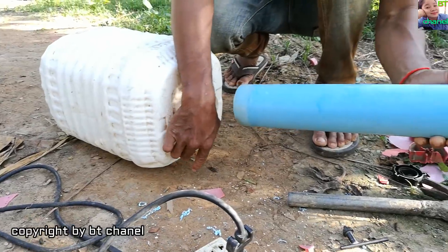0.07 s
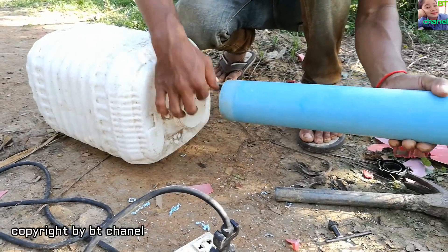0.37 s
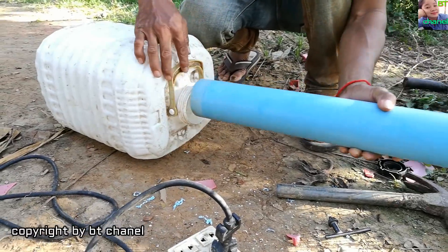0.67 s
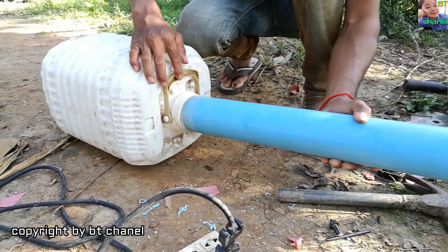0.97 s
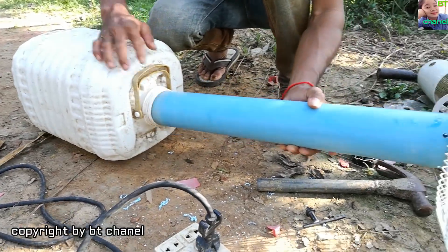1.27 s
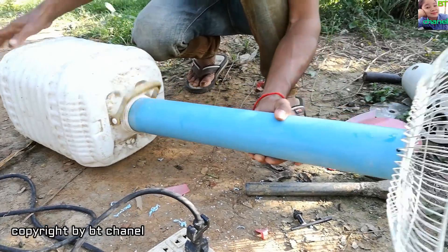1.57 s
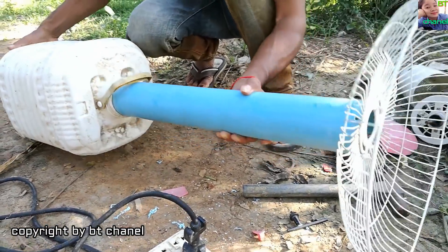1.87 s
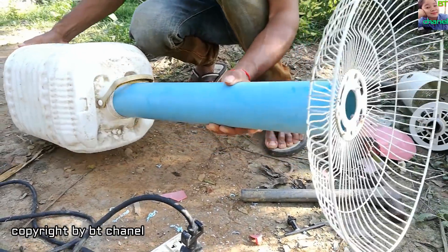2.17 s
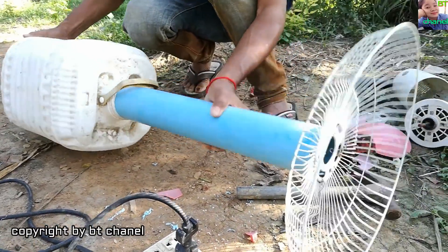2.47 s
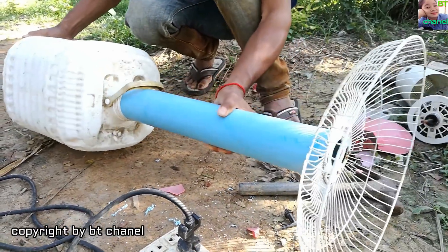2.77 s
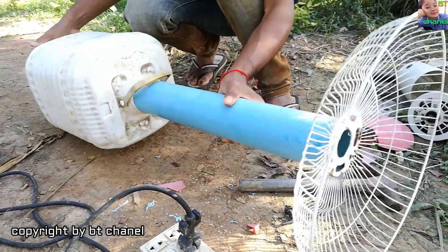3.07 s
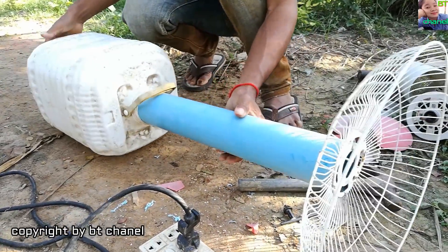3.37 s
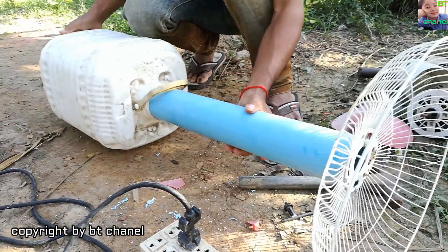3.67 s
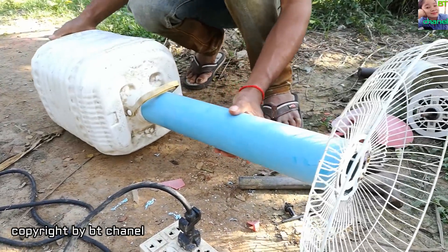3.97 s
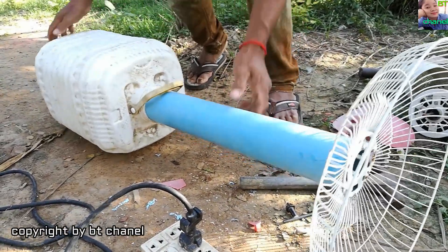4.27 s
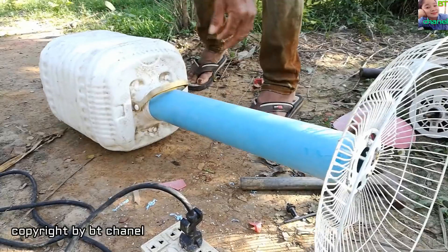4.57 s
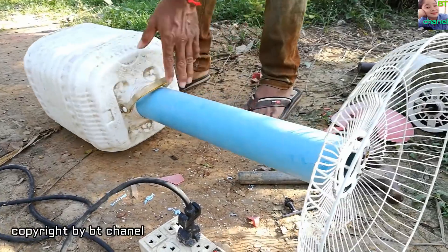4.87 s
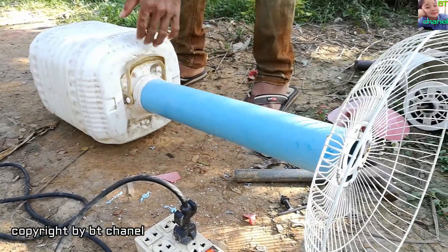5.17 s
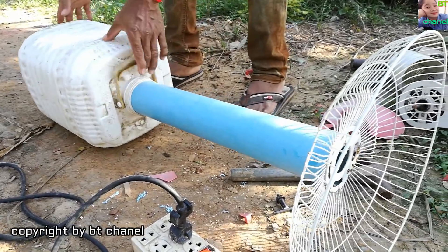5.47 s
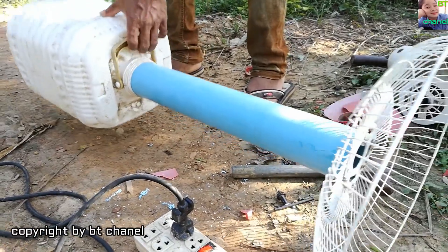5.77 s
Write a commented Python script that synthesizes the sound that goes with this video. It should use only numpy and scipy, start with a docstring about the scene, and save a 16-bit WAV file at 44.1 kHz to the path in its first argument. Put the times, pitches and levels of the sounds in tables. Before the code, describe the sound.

The handle of an empty plastic jerrycan flips over with a clack. A plastic pipe knocks and rubs hollowly against the neck, then scrapes into place. The can is tipped and dragged on bare ground, booming as grit ticks under it. Near the end its dented wall springs out with a loud pop, followed by a few knocks. A close phone microphone hears it outdoors, over a distant rumble and faint insects.

```python
"""Outdoors, over a distant rumble and faint insects, the handle of an empty jerrycan flips over and clacks.
A plastic pipe knocks, rubs and squeaks at the can's neck, then scrapes into place at about 2.4 s.
The hollow can is tipped and dragged on bare ground: it booms, grit ticks, and a jolt makes the wire fan
guard on the pipe ring faintly. Near 5 s the dented wall pops back out, and a few last knocks follow.
A phone with two microphones stands close by."""
import sys
import numpy as np
from scipy import signal
from scipy.fft import rfft, irfft
from scipy.io import wavfile
from scipy.ndimage import map_coordinates

SR = 44100
rng = np.random.default_rng(int(sys.argv[2]) if len(sys.argv) > 2 else 0)


def inscribe(sig):
    """Save sig as 16-bit PCM at rate SR to the path in sys.argv[1].

    A 1-D sig is mono; a 2-D sig holds one channel per row.
    Samples are clipped to [-1, 1] before scaling.
    """
    pcm = np.round(np.clip(np.atleast_2d(sig).T, -1, 1) * 32767)
    wavfile.write(sys.argv[1], SR, pcm.astype(np.int16))


N = 255780

# the notes that the can's wall and the pipe ring at: f/Hz, relative level/dB
CAN_NOTES = [(270, -4), (315, -5), (408, -3), (450, -3), (568, -4), (680, -6), (784, 1), (822, 0),
             (885, -1), (970, 3), (1312, -8), (2100, -11), (2770, -6), (3122, -5), (3245, -5), (4580, -9),
             (5092, -6), (5358, -8)]
PIPE_NOTES = [(824, -1), (1010, -1), (1360, -4), (1500, -5), (2090, -6), (2430, -6), (3060, 0), (3200, 0),
              (4750, -1), (5650, -2)]
KNOCK_HZ = 950  # the middle of a knock, between its low and high parts


def undb(db):
    """Turn decibels into a number to multiply by."""
    return 10 ** (np.asarray(db) / 20)


def rms(x):
    """The average strength of a sound."""
    return np.sqrt(np.mean(x ** 2)) + 1e-12


def band(x, lo, hi, order=3):
    """Keep the part of a sound between lo and hi Hz."""
    return signal.sosfilt(signal.butter(order, [lo, min(hi, .45 * SR)], "band", fs=SR, output="sos"), x)


def colour(x, points):
    """Turn lows and highs up or down along a curve of points: f/Hz, gain/dB."""
    hz, db = np.transpose(points)
    f = np.fft.rfftfreq(x.shape[-1], 1 / SR)
    return irfft(rfft(x) * undb(np.interp(np.log(f + 1), np.log(hz), db)), x.shape[-1])


def stereo_noise(size, apart_hz=340):
    """Noise at two microphones: alike in the bass, unrelated higher up."""
    f = np.fft.rfftfreq(size, 1 / SR)
    mid, side = rfft(rng.standard_normal((2, size)))
    share = .5 * f ** 6 / (f ** 6 + apart_hz ** 6)
    return irfft(mid * np.sqrt(1 - share) + side * np.sqrt(share) * np.array([[1], [-1]]), size)


def fade(t, t60):
    """Die away by 60 dB every t60 seconds."""
    return np.exp(-np.log(1000) * t / t60)


def wander(per_s):
    """Drift at random, roughly between -1 and 1, with per_s new goals a second."""
    goals = rng.standard_normal(int(per_s * N / SR) + 2)
    return np.interp(np.arange(N) * per_s / SR, np.arange(len(goals)), goals)


def add(out, start, sound):
    """Mix a sound in at a time in seconds."""
    i = max(0, int(start * SR))
    out[:, i:i + sound.shape[1]] += sound[:, :N - i]


def ring(notes, t, scatter_db, detune=.004, apart_hz=340):
    """Fading notes, a little different each time; high ones reach the two microphones out of step."""
    out = 0
    for hz, db, t60 in notes:
        size, shift, turn, skew = rng.standard_normal(4)
        gap = min(hz / apart_hz, 1) ** 4 * (np.pi / 4 + skew / 10)
        phase = np.pi * turn + gap * np.array([[1], [-1]])
        tone = np.sin(2 * np.pi * hz * (1 + detune * shift) * t + phase)
        out = out + undb(db + scatter_db * size) * fade(t, t60) * tone
    return out


def distant_rumble(level_db=-45.5, swell_db=-.5, half_width_hz=11.1):
    """A far-off rumble with wavering tones and a faint hiss of air and insects, swelling slightly."""
    # the shape of the rumble and hiss: f/Hz, relative level/dB
    air_shape = [(13, -34), (32, -7), (106, -7.5), (143, -8), (200, -13.5), (263, -10.5), (380, -27.5),
                 (570, -25.5), (1500, -29.5), (2450, -44.5), (6440, -51.5), (8000, -49), (10500, -44.5),
                 (12500, -49.5), (16000, -51)]
    # the wavering tones: f/Hz, level/dB
    low_tones = [(39, -59), (105, -48.5), (191, -48)]
    air = colour(stereo_noise(N), air_shape)
    low = signal.sosfiltfilt(signal.butter(2, KNOCK_HZ, fs=SR, output="sos"), air)
    out = sum(x * undb(level_db + swell_db * wander(4)) for x in (low, air - low)) / rms(air)
    for hz, db in low_tones:
        tone = band(rng.standard_normal(N), hz - half_width_hz, hz + half_width_hz, order=2)
        out = out + tone * undb(db) / rms(tone)
    return out


def insects(level_db=-77, swell_db=7, half_width_hz=160):
    """Faint insects in the grass swell and fade, each on its own pitch."""
    out = 0
    for hz in (9150, 9950):
        buzz = band(stereo_noise(N), hz - half_width_hz, hz + half_width_hz, order=2)
        out = out + buzz / rms(buzz) * undb(level_db + swell_db * np.minimum(wander(5), 1))
    return out


def whine(hz=14510, level_db=-76):
    """A thin, steady whine."""
    return undb(level_db) * np.sqrt(2) * np.sin(2 * np.pi * hz * np.arange(N) / SR)


def yard_echo(x, near_db=-21, near_t60=.2, far_db=-45.5, far_t60=.8):
    """The yard sends back a dull, scattered echo."""
    t = np.arange(SR) / SR
    arrival = np.clip((t - .008) / .017, 0, 1)
    near = band(stereo_noise(SR) * arrival * fade(t, near_t60), 150, 8500, order=1)
    far = band(stereo_noise(SR) * arrival * fade(t, far_t60), 200, 4000, order=2)
    echo = sum(undb(db) * h / np.sqrt(np.sum(h ** 2) / 2) for h, db in [(near, near_db), (far, far_db)])
    return signal.fftconvolve(x, echo, axes=1)[:, :N]


def wire_guard(t60=1.47, spokes_db=-15):
    """A jolt, dulled through the ground, rings the guard's hoops; its many unequal spokes shimmer above."""
    # jolts: t/s, level/dB, dull above f/Hz
    jolts = [(3.2, -42.5, 1230), (4.979, -48, 4500)]
    # notes of the hoops: f/Hz, relative level/dB
    hoops = [(613, 0), (678, -5), (925, -5), (1389, 0), (1432, 0), (1986, -7), (2900, -6), (3270, -5)]
    out, t = np.zeros((2, N)), np.arange(5 * SR // 4) / SR
    spokes = [(hz, spokes_db) for hz in rng.uniform(2200, 6200, 48)]
    notes = [(hz, db, t60) for hz, db in 2 * hoops + spokes]  # slightly mistuned pairs throb
    for start, db, dull_hz in jolts:
        wires = band(ring(notes, t, scatter_db=2, detune=.006), 450, dull_hz, order=1)
        add(out, start, wires * undb(db) / rms(wires[:, :int(.05 * SR)]))
    return out


def squeaks(width=.028):
    """Plastic slips on plastic and briefly locks on to one rough note."""
    # squeaks: t/s, length/s, f/Hz, level/dB
    rubs = [(.70, .13, 2480, -55), (2.08, .12, 1710, -63)]
    out = np.zeros((2, N))
    for start, length, hz, db in rubs:
        size = int(length * SR)
        tone = band(stereo_noise(size), hz * (1 - width), hz * (1 + width), order=2) * np.hanning(size)
        add(out, start, tone * undb(db) / rms(tone))
    return out


def grit_crackle(grit_db, per_s=28):
    """Single grains of grit snap at random, louder while something slides."""
    out, t = np.zeros((2, N)), np.arange(SR // 50) / SR
    for start, size in rng.random((int(per_s * N / SR), 2)):
        start *= N / SR
        grain = band(stereo_noise(len(t)) * fade(t, .012), 2000, 14000, order=1)
        db = min(grit_db[int(start * SR)], -54) - 10 + 16 * size ** 2
        add(out, start, grain * undb(db) / rms(grain))
    return out


def ticks(click_db=5):
    """Grit and plastic touch: a sharp click with a short rustle of the wall behind it."""
    # ticks: t/s, level of the crack/dB, high snap relative to the crack/dB
    touches = [(0.165, -45.5, -22), (2.296, -42.5, -24), (2.42, -40.5, 9), (2.464, -38, -6),
               (2.785, -49.5, -9), (2.886, -46.5, -7), (3.122, -52, 16), (3.244, -45.5, -13),
               (3.299, -42.5, -13), (3.337, -45, -15), (4.205, -51, -30), (4.74, -41.5, 3.5),
               (4.862, -55, -4)]
    out, t = np.zeros((2, N)), np.arange(SR // 8) / SR
    attack = int(.008 * SR)
    for start, db, snap_db in touches:
        click = stereo_noise(len(t)) * (fade(t, .06) + undb(click_db) * fade(t, .008))
        for lo, hi, part_db in [(1000, 4100, db), (5800, 14000, db + snap_db)]:
            part = band(click, lo, hi, order=2)
            add(out, start, part * undb(part_db) / rms(part[:, :attack]))
    return out


def stroke_levels():
    """Drone, rasp and grit over time, in dB: each push or drag takes hold, slides and coasts to a stop."""
    # pushes of the pipe and drags of the can; weight makes the can drone, grit under it hisses:
    # t/s, length/s, rasp/dB, drone relative to rasp/dB, grit relative to rasp/dB
    strokes = [(0.674, 0.34, -59.5, 15.5, -4), (1.02, 0.34, -53, 12, -5), (1.43, 0.24, -54, 8.5, -4.5),
               (1.907, 0.07, -48, 7, -6.5), (2.035, 0.091, -55, 8, -13), (2.29, 0.023, -52.5, 14.5, -9),
               (2.324, 0.071, -49.5, 16.5, -21), (2.42, 0.079, -48.5, 11.5, -17),
               (2.755, 0.29, -58, 14.5, -6), (3.113, 0.14, -45, 16.5, -8.5), (3.54, 0.14, -54.5, 9.5, -5.5),
               (4.207, 0.13, -49.5, -1, -12), (4.569, 0.36, -56, 9.5, -8), (4.933, 0.031, -36.5, 2, -36),
               (5.656, 0.056, -58, 2.5, -11)]
    # hands rubbing lightly all along: drone/dB, rasp/dB, grit/dB
    holding = [-56.5, -67.5, -78.5]
    # time to die away after a stroke: drone/s, rasp/s, grit/s
    coast_t60 = [0.62, 0.3, 0.42]
    t = np.arange(0, N / SR, .001)
    power = undb(holding)[:, None] ** 2
    for start, length, rasp_db, drone_db, grit_db in strokes:
        grip = np.clip((t - start) / (.012 + .13 * length), 0, 1)  # long strokes take hold more slowly
        coast = fade(np.maximum(t - start - length, 0), np.array(coast_t60)[:, None])
        strength = undb(rasp_db + np.array([[drone_db], [0], [grit_db]]))
        power = power + (strength * grip * coast) ** 2
    return [np.interp(np.arange(N) / SR, t, db) for db in 10 * np.log10(power)]


def random_slips(per_s):
    """Tiny jerks, forwards or backwards, at random moments."""
    return (rng.random(N) < per_s / SR) * rng.choice([-1, 1], N)


def friction(per_s, spread_db, t60, notes_db, catch_db, flex=.07):
    """The can sticks and slips; each slip rings its wall, whose notes drift as it bends."""
    t = np.arange(SR // 12) / SR
    catch = catch_db * wander(110)
    notes = [(hz, notes_db + db, t60) for hz, db in CAN_NOTES]
    out = 0
    for spot in range(3):  # each spot of the wall rings differently
        slips = random_slips(per_s) * undb(spread_db * np.minimum(rng.exponential(size=N), 4) + catch)
        clear = ring(notes, t, scatter_db=5, detune=.04)
        wall = stereo_noise(len(t)) * (fade(t, t60) + 2 * fade(t, .0031)) + clear
        out = out + signal.oaconvolve(slips[None], wall, axes=1)[:, :N]
    place = np.cumsum(1 + flex * wander(10))  # an uneven speed bends the pitch
    return np.array([map_coordinates(x, [place], mode="mirror") for x in out])


def sliding(drone_db, rasp_db, grit_db):
    """Slow slips make the can boom and drone; fine grit rasps and hisses under it."""
    coarse = friction(per_s=150, spread_db=2, t60=.055, notes_db=-8, catch_db=.5)
    fine = friction(per_s=1100, spread_db=5.5, t60=.04, notes_db=-18, catch_db=2)
    layers = [(band(coarse, 110, 321.5), drone_db - 1.5),
              (band(coarse, 200, 1600, order=2), drone_db - 5),
              (band(fine, 1300, 4600), rasp_db - 1.5),
              (band(fine, 5600, 15500, order=2), grit_db + 7.5)]
    return sum(x * undb(db) / rms(x) for x, db in layers)


def pipe_scrape(start_s=2.339, stop_s=2.394, end_db=-22.5, rise_db=11):
    """The tight pipe is forced into the neck: quick slips ring it harder and harder until it stops."""
    t = np.arange(N) / SR
    way = np.clip((t - start_s) / (stop_s - start_s), 0, 1)
    force = np.minimum(20 * way, 1) * undb(rise_db * (way - 1))
    force *= fade(np.maximum(t - stop_s, 0), .15)
    age = t[:SR // 10]
    notes = [(hz, db - 17, .05 * np.sqrt(KNOCK_HZ / hz)) for hz, db in PIPE_NOTES]
    rasp = 0
    for spot in range(4):  # the rim touches at several spots
        slips = random_slips(per_s=380) * undb(2.5 * rng.standard_normal(N))
        wall = stereo_noise(len(age)) * fade(age, .015) + ring(notes, age, scatter_db=1, detune=.02)
        rasp = rasp + signal.oaconvolve(slips[None], wall, axes=1)[:, :N]
    rasp = band(rasp, KNOCK_HZ, 16700, order=1)
    return rasp * force * undb(end_db) / rms(rasp)


def blows(hits, notes, zones_db, notes_db, crack_db, crack_s, treble_damp, ring_s, scatter_db=2):
    """Struck plastic: a brief crack, a blur of wall notes, a few clear ones and the boom of the air."""
    # five zones (boom, hollow, knock, crack, snap): lowest f/Hz, highest f/Hz
    zones = [(88, 220), (220, 600), (600, 1500), (1500, 6000), (6000, 13000)]
    out, t = np.zeros((2, N)), np.arange(SR // 4) / SR
    push = 1 - np.exp(-t / .00069)
    octaves = np.log2(np.sqrt(np.prod(zones[1:], axis=1)) / KNOCK_HZ)
    for start, level_db, softness, boom_db, boom_hz in hits:
        # zones_db sets the four upper zones for a hard blow; a softer one is duller and rings longer
        levels = [boom_db, *(level_db + np.array(zones_db) - softness * octaves)]
        t60 = ring_s + .0051 * max(softness, 0)
        # in plastic, high notes die sooner
        wall_notes = [(hz, notes_db + db, t60 * (600 / hz) ** .39) for hz, db in notes]
        clear = ring(wall_notes + [(boom_hz, -5, t60)], t, scatter_db)
        for k, ((lo, hi), db) in enumerate(zip(zones, levels)):
            decay = fade(t, t60 * treble_damp ** (k - 2)) + undb(crack_db) * fade(t, crack_s)
            part = band((stereo_noise(len(t)) * decay + clear) * push, lo, hi)
            add(out, start, part * undb(db) / rms(part[:, :int(.02 * SR)]))
    return out


def handle_clacks():
    """The carrying handle flips over and clacks."""
    # clacks: t/s, level/dB, softness/(dB per octave), boom level/dB, boom f/Hz
    hits = [(.124, -47, 10.5, -51, 190), (.1635, -43, 11.5, -43, 186), (.4302, -22, 3.5, -27, 158.3)]
    # the handle's notes: f/Hz, relative level/dB
    notes = [(400, -8), (544, -6), (824, -11), (1093, 3), (1255, 0), (2089, -11), (2476, -9), (3268, -13),
             (3811, -16), (5184, -15)]
    return blows(hits, notes, zones_db=[-10.5, 2, 4, 3], notes_db=-8.5,
                 crack_db=-2, crack_s=.02, treble_damp=.85, ring_s=.105)


def pipe_taps():
    """The pipe taps and snaps against the can's neck."""
    # taps: t/s, level/dB, softness/(dB per octave), boom level/dB, boom f/Hz
    hits = [(.974, -38.5, 8.5, -37.5, 157), (1.565, -27.5, 1, -37, 105.5), (1.955, -39.5, 1.5, -47, 118),
            (3.004, -39.5, 4, -53, 110)]
    return blows(hits, PIPE_NOTES, zones_db=[-7.5, 0, .5, 2.5], notes_db=-14,
                 crack_db=6.5, crack_s=.0065, treble_damp=.6, ring_s=.16)


def can_knocks():
    """Pipe, hand and ground hit the can; its boom's pitch depends on the hold and the blocked neck."""
    # knocks: t/s, level/dB, softness/(dB per octave), boom level/dB, boom f/Hz
    hits = [(.721, -37, 8.5, -30.5, 151.5), (.861, -53, 11, -38, 158), (.893, -68, -1, -32.5, 160.4),
            (1.0445, -32.5, 9.5, -30.5, 144.4), (1.206, -40.5, 12, -32.5, 149),
            (1.2345, -26.5, 4.5, -16.5, 141.5), (1.249, -25, 4, -24, 140.6), (2.397, -35, 6, -26, 137),
            (2.421, -37.5, 10, -47, 178), (3.136, -25, 5, -37, 94), (3.212, -33.5, 8.5, -33, 94),
            (3.23, -39, 7.5, -41, 95), (3.298, -39.5, 9, -43.5, 97), (3.619, -41, 6.5, -36, 122),
            (4.929, -36.5, 2, -41.5, 99), (5.44, -24.5, 1, -65, 105.3), (5.474, -32, 4.5, -56, 106),
            (5.526, -47.5, 6, -59.5, 105)]
    return blows(hits, CAN_NOTES, zones_db=[-8, .5, 2.5, 0], notes_db=-13,
                 crack_db=3.5, crack_s=.0024, treble_damp=.62, ring_s=.13)


def wall_pop(thump_hz=48, thump_db=-28, thump_t60=.09):
    """The dented wall springs out and the whole can rings; a short, deep thump comes with the loud pop."""
    # the pop: t/s, level/dB, softness/(dB per octave), boom level/dB, boom f/Hz
    pops = [(4.9765, -8.5, 0.94, -37.5, 105.7)]
    out = blows(pops, CAN_NOTES, zones_db=[-9.5, 0, .5, 1], notes_db=-8,
                crack_db=2, crack_s=.012, treble_damp=.7, ring_s=.145, scatter_db=1)
    t = np.arange(SR // 4) / SR
    thump = undb(thump_db) * fade(t, thump_t60) * np.sin(2 * np.pi * thump_hz * t)
    for start, *_ in pops:
        add(out, start, thump[None])
    return out


def scene():
    """Mix the sounds of can and pipe, their echo, the background and the ringing guard."""
    drone_db, rasp_db, grit_db = stroke_levels()
    close = handle_clacks() + can_knocks() + pipe_taps() + wall_pop() + ticks()
    close += sliding(drone_db, rasp_db, grit_db) + pipe_scrape() + grit_crackle(grit_db) + squeaks()
    return close + yard_echo(close) + distant_rumble() + insects() + whine() + wire_guard()


def record(dry, bend=.081, top_hz=16100):
    """Each microphone colours the sound and bends loud peaks; the phone clips and cuts the top treble."""
    # the colour both microphones share: f/Hz, gain/dB
    mic_colour = [(300, -0.5), (620, 0.5), (900, -1), (1700, 1), (2800, 4), (4200, -0.5), (5800, -2),
                  (7800, -9), (10000, -8.5), (14000, -14.5)]
    # how the two differ: f/Hz, left minus right/dB
    mic_balance = [(380, 0), (720, 10.5), (950, 0.5), (2000, 0), (3100, -3.5), (4300, -0.5), (6300, -3),
                   (9500, 11), (15000, 5.5)]
    hz, tilt = np.transpose(mic_balance)
    mean_db = 10 * np.log10(np.cosh(tilt * np.log(10) / 20))  # keeps their total power the same
    curves = [np.c_[hz, side * tilt / 2 - mean_db] for side in (1, -1)]
    heard = np.array([colour(x, curve) for x, curve in zip(colour(dry, mic_colour), curves)])
    heard = np.clip(heard + bend * heard ** 2, -1, 1)
    return signal.sosfilt(signal.ellip(8, .2, 70, top_hz, fs=SR, output="sos"), heard)


dry = scene()
out = record(dry)
inscribe(out)
```